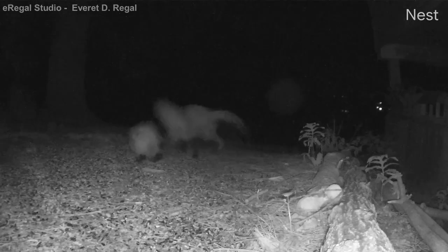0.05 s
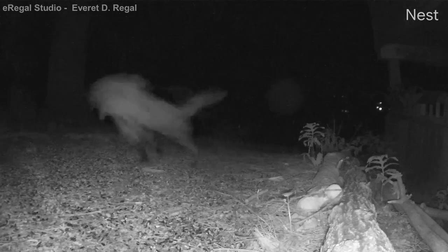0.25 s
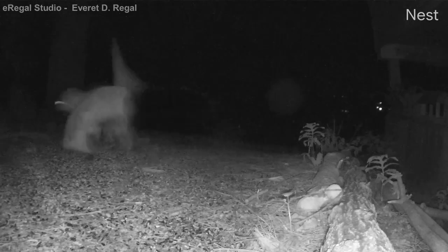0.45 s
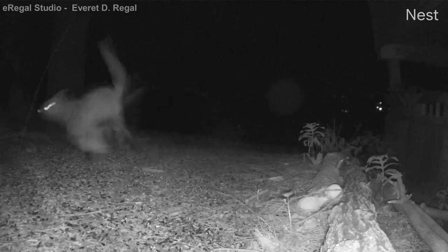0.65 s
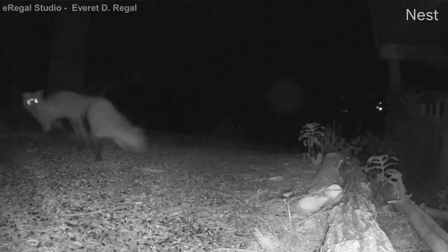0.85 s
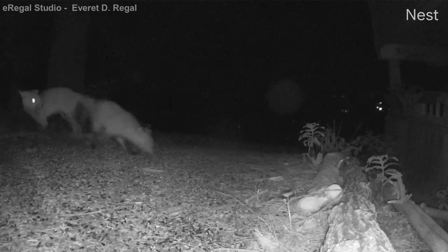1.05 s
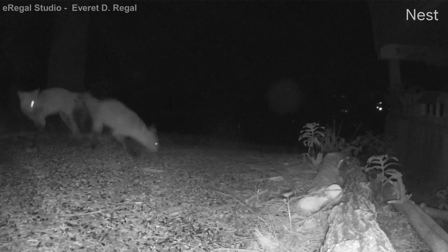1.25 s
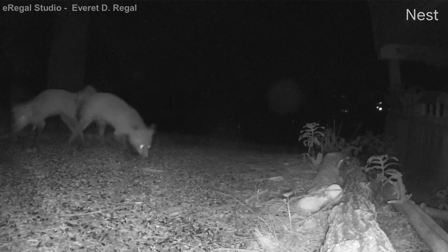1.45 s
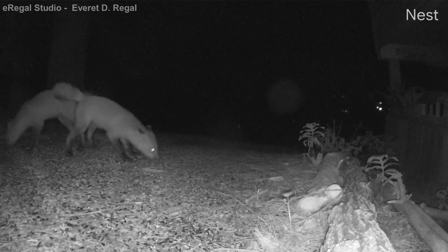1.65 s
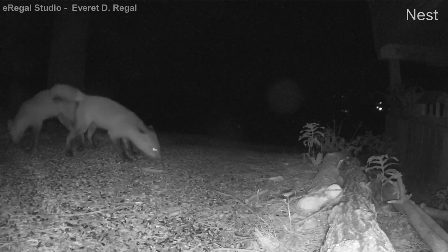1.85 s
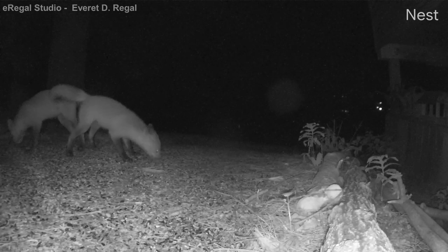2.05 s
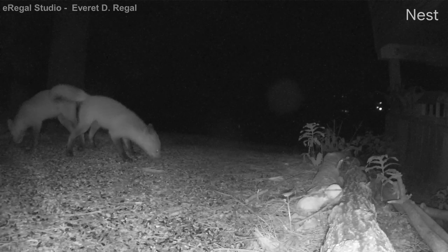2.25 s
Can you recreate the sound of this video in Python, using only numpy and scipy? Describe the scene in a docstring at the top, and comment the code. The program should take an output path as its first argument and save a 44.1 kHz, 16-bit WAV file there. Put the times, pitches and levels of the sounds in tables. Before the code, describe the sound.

Two foxes scuffle in a yard at night, paws thudding and rustling dry leaves. One growls quietly, gives a short whining snarl, then a throaty cough and yelp. An insect trills over faint hiss, heard through a small outdoor microphone.

```python
"""An insect trills steadily over a faint hiss in a yard at night; then two foxes scuffle on dry leaves.
One growls, breaks into a short whining snarl and later gives a throaty cough and yelp. The rough calls
are irregular throat pulses filtered by the mouth; the whine is a harmonic series. Paws thud on the soil
and kick up the litter, whose many tiny cracks merge into a rustle. A house wall and a fence return
faint echoes, and all is heard through a small outdoor camera microphone."""
import sys
import numpy as np
from scipy import signal
from scipy.fft import rfft, irfft, next_fast_len
from scipy.io import wavfile
from scipy.ndimage import uniform_filter1d

SR = 44100
rng = np.random.default_rng(int(sys.argv[2]) if len(sys.argv) > 2 else 0)


def put_to_file(sound):
    """Save the sound as 16-bit audio at rate SR, in the file named by the first command-line argument."""
    columns = np.atleast_2d(sound).T  # one column per channel
    safe = np.clip(columns, -1, 1)
    whole_steps = np.round(safe * 32767)
    wavfile.write(sys.argv[1], SR, whole_steps.astype(np.int16))


N = 101429
T = np.arange(N) / SR

# the insect's tone: (time [s], frequency [Hz], level [dB])
INSECT_TONE = [(0, 3830, -65), (.12, 3772, -64.5), (.35, 3805, -66.5), (1.4, 3835, -69), (2.3, 3852, -68)]
# hiss of the yard: (frequency [Hz], relative density [dB])
HISS_SPECTRUM = [(60, -43.5), (135, -49), (190, -4), (400, -2.5), (900, 1), (2000, 4), (3150, 0),
                 (3400, -23.5), (3620, -22), (3800, 3.5), (4080, -20.5), (4350, 8.5), (5100, 4),
                 (5450, -0.5), (5900, -5.5), (7200, -9), (8000, -26.5), (9300, -19.5), (11000, -38)]
# the opening growl: (time [s], level [dB])
GROWL_ENVELOPE = [(.13, -80.5), (.195, -55), (.222, -64), (.24, -58.5), (.295, -59), (.33, -51.5),
                  (.365, -65), (.4, -51.5), (.418, -107)]
# resonances of a mouth with bared teeth: (frequency [Hz], relative gain [dB])
TEETH_RESPONSE = [(100, -6.5), (185, 8), (330, 1.5), (560, 9), (800, 1.5), (1100, 6), (1500, -6.5),
                  (2000, 1), (2600, -28), (4000, -57)]
# paws sweep the leaves: (start [s], rise [s], relative level [dB], T60 [s], crispness [dB])
LEAF_SCUFFS = [(0.171, 0.055, -64.5, 0.61, 4), (0.325, 0.0052, -53, 0.33, -2.5),
               (.345, 0.04, -55.5, 0.4, 8), (0.402, 0.023, -47, 0.17, 27), (0.426, 0.035, -42.5, 0.16, 1),
               (0.486, 0.006, -49, 0.4, -0.5), (0.55, 0.021, -52, 1, -3.5), (0.629, .016, -39.5, 0.016, -3),
               (0.713, 0.005, -50, 0.15, -2.5), (0.758, 0.014, -52.5, 0.15, 1),
               (0.788, 0.0091, -39, 0.022, -0.5), (0.8, 0.0046, -43, 0.3, -2),
               (.849, 0.006, -45, 0.028, -8), (0.888, 0.018, -42, 0.56, 3.5), (.964, 0.018, -46, 0.14, -1),
               (1.004, 0.0074, -42, 0.31, 3), (1.083, 0.029, -50.5, 0.25, -2),
               (1.119, 0.036, -43.5, 0.28, 0.5), (1.185, 0.0075, -49, 0.72, 2.5),
               (1.233, 0.018, -48, 0.15, 1), (1.28, 0.029, -52.5, 0.52, 1), (1.409, 0.048, -44.5, 0.24, 0),
               (1.462, 0.014, -43.5, 0.18, -3), (1.488, 0.0059, -43.5, 0.079, -9.5),
               (1.51, 0.031, -61, 0.99, 5), (1.61, 0.051, -53, 0.21, -3), (1.681, 0.088, -56, 0.23, -5.5),
               (1.74, .052, -46, 0.63, 0.5), (1.85, 0.043, -56.5, 0.38, 17), (2.137, 0.015, -60, 0.68, 3)]
# dull crunch and crisp edge of the litter: (frequency [Hz], relative gain [dB])
CRUNCH_SPECTRUM = [(150, -31), (300, -11), (600, -8.5), (1000, -1.5), (1500, -11), (1950, -2.5),
                   (2500, 2.5), (3200, 0), (4200, -19), (6000, -55.5)]
CRISP_SPECTRUM = [(2500, -22.5), (3300, -22), (3750, 0), (4150, -3.5), (4550, 2.5), (5100, 4), (5330, -2),
                  (5540, -2.5), (6000, -9.5), (6450, -9.5), (7200, -19.5), (8000, -46.5), (8600, -29.5),
                  (9400, -27.5), (10700, -42), (12000, -26)]
# paws land on soil: (start [s], level [dB], T60 [s], nominal cutoff [Hz], relative body weight [dB])
LANDINGS = [(0.185, -54.5, 0.14, 660, 9), (0.231, -56, 0.25, 650, 7), (.386, -46, 0.056, 670, -20),
            (0.727, -40, 0.057, 670, -11), (0.792, -42, 0.029, 564, 4), (0.814, -45.5, 0.12, 1010, -30),
            (0.853, -51.5, 0.073, 1200, -46), (0.95, -51.5, 0.1, 780, -25),
            (0.981, -52.5, 0.0079, 1100, -20), (1.129, -50.5, 0.07, 686, -17),
            (1.164, -55.5, 0.01, 555, -20), (1.43, -54, 0.02, 475, 8.5), (1.772, -50, 0.043, 820, -30)]
# brittle leaves break under a paw: (start [s], rise [s], relative level [dB], T60 [s])
LEAF_CRUSHES = [(0.429, 0.0017, -35.5, 0.15), (0.437, 0.0042, -49, 0.067), (0.454, 0.0019, -40, 0.035),
                (0.636, 0.006, -43.5, 0.035), (0.791, 0.0034, -38, 0.026), (1.01, 0.022, -46.5, 0.065)]
# cracks of the breaking leaves: (frequency [Hz], relative density [dB])
BRITTLE_SPECTRUM = [(1000, -25), (1700, -10), (2050, -3), (2350, -14), (3200, -46), (3700, -5.5),
                    (4150, 1.5), (4600, -13), (5100, -4), (5500, -18), (5950, 1), (6450, -6), (6800, -18),
                    (8000, -34), (9600, -28), (10700, -41)]
# modes of the crushed leaves: (frequency [Hz], relative level [dB])
LEAF_MODES = [(2050, -11), (3768, -6), (4167, -4), (4520, -3), (4635, -1), (4888, 0), (5100, -2),
              (6185, -8), (6449, -7), (9600, -21)]
# course of the snarl: (time [s], level [dB], roughness [ratio, clipped to 0-1])
SNARL_ENVELOPE = [(.45, -95, 1.2), (.475, -56, 0.93), (.525, -60, 1.16), (.548, -50, 0.6),
                  (.57, -47.5, 0.96), (.588, -38.5, 0.88), (.605, -43.5, 0), (.622, -44.5, 0.24),
                  (.638, -46, 0.6), (.655, -40.5, 0.3), (.684, -43.5, 0.16), (.705, -50, 0.6),
                  (.735, -49.5, 0.76), (.765, -49.5, 0.6), (.835, -60.5, 0.92), (.866, -66, 0.87),
                  (.885, -86, 0.8)]
# fundamental of the whine: (time [s], frequency [Hz])
WHINE_PITCH = [(.54, 350), (.566, 262), (.582, 300), (.594, 405), (.612, 420), (.628, 408), (.638, 440),
               (.647, 468), (.657, 450), (.668, 416), (.684, 412), (.702, 355), (.738, 330), (.755, 288)]
# partials of the whine: (harmonic [number], relative level [dB])
WHINE_PARTIALS = [(1, 5.5), (2, 7), (3, -12), (4, -20)]
# resonances of the snarling throat: (frequency [Hz], relative gain [dB])
THROAT_RESPONSE = [(100, -43), (190, -28), (300, -5), (430, 6.5), (600, 7), (800, 2), (950, 5.5),
                   (1080, -11), (1300, -24), (1600, -22), (3000, -44)]
# bursts of the cough: (start [s], rise [s], level [dB], T60 [s], mouth opening [frequency factor])
COUGH_BURSTS = [(1.406, 0.0062, -58, 0.21, 0.57), (1.418, 0.0095, -55, 0.33, 0.89),
                (1.48, 0.0075, -54, 0.045, 1.05)]
# resonances of the mouth at an opening of 1: (frequency [Hz], relative gain [dB])
MOUTH_RESPONSE = [(200, -38), (400, -22), (570, -18), (730, 8.5), (880, 3.5), (1000, 1), (1130, 1),
                  (1260, -6), (1500, -43), (2000, -9), (3000, -41)]
# the yelp rings in the open mouth: (frequency [Hz], level [dB], rise [s], T60 [s])
YELP_PARTIALS = [(495, -52, 0.0046, .06), (727, -37.5, 0.004, 0.031), (906, -44, 0.0057, 0.079),
                 (1120, -47.5, 0.0054, 0.085), (1357, -55.5, .009, 0.092)]
# house wall and fence: (delay [s], gain [dB])
REFLECTIONS = [(0.014, -32), (.029, -14), (.052, -29.5)]

CRACKS_PER_S = 2800


def from_db(db):
    """Amplitude ratio for a level in decibels."""
    return 10 ** (np.asarray(db) / 20)


def unit_rms(x):
    """Normalisation to unit mean power."""
    return x / np.sqrt(np.mean(x ** 2) + 1e-20)


def in_time(rows):
    """Linear interpolation of each column over the time in the first."""
    times, *columns = np.transpose(rows)
    return [np.interp(T, times, column) for column in columns]


def colour(x, spectrum):
    """Minimum-phase filtering by the given spectrum, normalised to unit power."""
    size = 2 * next_fast_len(N)
    hz, db = np.transpose(spectrum)
    bin_hz = np.maximum(np.arange(size // 2 + 1) * SR / size, 1)
    gain = from_db(np.interp(np.log(bin_hz), np.log(hz), db))
    cepstrum = irfft(np.log(gain))
    cepstrum[1:size // 2] *= 2  # folding the cepstrum makes the filter causal
    cepstrum[size // 2 + 1:] = 0
    return unit_rms(irfft(rfft(x, size) * np.exp(rfft(cepstrum)))[:N])


def drift(corner_hz, size=8192):
    """Low-pass noise of unit power, for random modulation."""
    bin_hz = np.arange(size // 2 + 1) * SR / N
    slow = irfft(rfft(rng.standard_normal(size)) / (1 + (bin_hz / corner_hz) ** 2), size)
    return unit_rms(np.interp(np.arange(N) * size / N, np.arange(size), slow))


def evened(x, window=700):
    """Division by the running RMS holds short-time power steady."""
    power = uniform_filter1d(uniform_filter1d(x ** 2, window), window)
    return x / np.sqrt(power + 1e-6)


def swell(start, rise, t60):
    """Linear attack, then exponential decay by 60 dB in t60 seconds."""
    age = T - start
    return np.clip(age / rise, 0, 1) * from_db(-60 * np.maximum(age - rise, 0) / t60)


def clicks(per_s, spread_db=1):
    """A Poisson train of impulses, uneven in size and sign."""
    sizes = from_db(spread_db * np.minimum(rng.exponential(1, N), 5)) * rng.choice([-1, 1], N)
    return unit_rms(sizes * (rng.random(N) < per_s / SR))


def wavering_tone(hz, width_hz):
    """Narrow-band noise of even strength is heard as an unsteady pitch."""
    phase = 2 * np.pi * hz * T
    return evened(drift(width_hz) * np.sin(phase) + drift(width_hz) * np.cos(phase), window=400)


def insect():
    """Random frequency and amplitude modulation turn a thin tone into a trill."""
    pitch, level_db = in_time(INSECT_TONE)
    phase = 2 * np.pi * np.cumsum(pitch * (1 + 0.006 * drift(120))) / SR
    flutter = from_db(3 * drift(53))
    return from_db(level_db) * unit_rms(np.sin(phase) * flutter)


def hiss():
    """Stationary filtered noise forms the background of the yard."""
    return from_db(-65) * colour(rng.standard_normal(N), HISS_SPECTRUM)


def rasp(resonances, pulses_per_s=130, jitter=0.22):
    """Source and filter: irregular throat pulses, each with a puff of air, excite the mouth."""
    cycles = np.cumsum(pulses_per_s * np.exp(jitter * drift(80.19))) / SR
    pulses = unit_rms(np.diff(np.floor(cycles), prepend=0))
    air = unit_rms(rng.standard_normal(N) * np.exp(-2.5 * (cycles % 1)))
    return evened(colour(pulses + air, resonances))


def growl():
    """Aperiodic voicing through bared teeth gives a quiet, unpitched warning."""
    level_db, = in_time(GROWL_ENVELOPE)
    return from_db(level_db) * rasp(TEETH_RESPONSE)


def tinny_ring(count=50, low_hz=1900, high_hz=10800, waver_hz=16, spread_db=8):
    """Close inharmonic partials ring in the rustle; each scuff brings a new set."""
    spacing_hz = (high_hz - low_hz) / count
    latest_scuff = np.searchsorted(np.sort([row[0] for row in LEAF_SCUFFS]), T)
    shape = (count, len(LEAF_SCUFFS) + 1)
    offset = rng.random(shape)
    level_db = spread_db * rng.uniform(-1.13, 1, shape)
    ring = 0
    for k in range(count):
        hz = low_hz + spacing_hz * (k + offset[k][latest_scuff]) + waver_hz * drift(60)
        gain = uniform_filter1d(from_db(level_db[k][latest_scuff]), size=200)
        ring += gain * np.sin(2 * np.pi * (rng.random() + np.cumsum(hz) / SR))
    return unit_rms(ring)


def rustle():
    """Scuffs set off swarms of tiny cracks over a swish; being incoherent, they add in power."""
    crunch_power, crisp_power = 0, 0
    for start, rise, db, t60, crispness_db in LEAF_SCUFFS:
        power = (from_db(db) * swell(start, rise, t60)) ** 2
        crisp_power += power
        crunch_power += power * from_db(-0.71 * crispness_db) ** 2  # crisper scuffs crunch less
    cracks = clicks(CRACKS_PER_S)
    swish = from_db(4.5) * rng.standard_normal(N)
    litter = evened(cracks + swish)
    ring = tinny_ring()
    crunch = from_db(-7.5) * evened(colour(litter + from_db(-4) * ring, CRUNCH_SPECTRUM))
    crisp = from_db(-0.5) * evened(colour(litter + from_db(7) * ring, CRISP_SPECTRUM))
    flicker = from_db(1.5 * drift(120))
    return (np.sqrt(crunch_power) * crunch + np.sqrt(crisp_power) * crisp) * flicker


def paw_thuds(soil_low_hz=226, body_hz=55, rise_s=0.0032):
    """Each impact is a cluster of band-limited knocks on soil over the low weight of the body."""
    thuds = np.zeros(N)
    body_band = signal.butter(2, body_hz, fs=SR, output="sos")
    body = unit_rms(signal.sosfilt(body_band, rng.standard_normal(N)))
    for start, db, t60, cutoff_hz, weight_db in LANDINGS:
        soil_band = signal.butter(3, [soil_low_hz, 1.14 * cutoff_hz], "band", fs=SR, output="sos")
        knocks = signal.sosfilt(soil_band, clicks(per_s=900) + 1e-18)
        impact = evened(unit_rms(knocks), window=500) + from_db(weight_db - 9) * body
        thuds += from_db(db) * swell(start, rise_s, t60) * impact
    return thuds


def leaf_crush():
    """Brittle fracture: under the hardest steps dry leaves crack and their modes ring."""
    cracks = colour(evened(clicks(CRACKS_PER_S), window=300), BRITTLE_SPECTRUM)
    ring = unit_rms(sum(from_db(db) * wavering_tone(hz, width_hz=35) for hz, db in LEAF_MODES))
    snap = from_db(-5) * cracks + from_db(-1.5) * ring
    return snap * sum(from_db(db) * swell(start, rise, t60) for start, rise, db, t60 in LEAF_CRUSHES)


def snarl(jitter=0.018, shimmer_db=3):
    """Voicing passes from aperiodic rasp to harmonic whine and back in an equal-power blend."""
    level_db, roughness = in_time(SNARL_ENVELOPE)
    roughness = np.clip(roughness, 0, 1)
    pitch, = in_time(WHINE_PITCH)
    phase = 2 * np.pi * np.cumsum(pitch * (1 + jitter * drift(95))) / SR
    harmonics = sum(from_db(db + shimmer_db * drift(83)) * np.sin(k * phase) for k, db in WHINE_PARTIALS)
    whine = unit_rms(harmonics) * (1 + 0.22 * np.sin(phase / 2))  # strong and weak cycles alternate
    voice = np.sqrt(1 - roughness ** 2) * whine + roughness * rasp(THROAT_RESPONSE)
    return from_db(level_db) * voice


def cough():
    """The formants rise from one rasping burst to the next as the mouth opens toward the yelp."""
    bursts = 0
    for start, rise, db, t60, opening in COUGH_BURSTS:
        formants = [(hz * opening, gain_db) for hz, gain_db in MOUTH_RESPONSE]
        bursts += from_db(db) * swell(start, rise, t60) * rasp(formants)
    return bursts


def yelp(start_s=1.484, jitter=0.015):
    """Damped resonances of the open mouth ring in one short, clear cry."""
    clock = np.cumsum(1 + jitter * drift(55)) / SR  # all partials waver together
    return sum(from_db(db) * swell(start_s, rise, t60) * np.sin(2 * np.pi * (hz * clock + rng.random()))
               for hz, db, rise, t60 in YELP_PARTIALS)


def settling_ticks(rise_s=0.0085, t60_s=0.076):
    """Two quickly damped narrow-band ticks sound as the foxes settle."""
    first = from_db(-59.5) * swell(2.028, rise_s, t60_s)
    second = from_db(-56.5) * swell(2.204, rise_s, t60_s)
    return (first + second) * wavering_tone(hz=3510, width_hz=60)


def scene():
    """Superposition of the foxes' direct sound, its delayed reflections and the night background."""
    footwork = rustle() + leaf_crush() + settling_ticks() + paw_thuds()
    foxes = footwork + growl() + snarl() + cough() + yelp()
    echoes = sum(from_db(db) * np.interp(T - delay, T, foxes, left=0) for delay, db in REFLECTIONS)
    return (foxes + echoes + insect() + hiss())[None]


def record(dry, bass_hz=160, leak_db=-19.5, notch_hz=5530, top_hz=10900):
    """The small microphone is a band-pass filter that leaks a little bass and has a treble notch."""
    high_pass = signal.butter(7, bass_hz, "high", fs=SR, output="sos")
    low_pass = signal.ellip(8, 0.2, 70, top_hz, fs=SR, output="sos")
    thin = signal.sosfilt(high_pass, dry) + from_db(leak_db) * dry
    hollow = signal.lfilter(*signal.iirnotch(notch_hz, Q=14, fs=SR), thin)
    return signal.sosfilt(low_pass, hollow)


dry = scene()
out = record(dry)
put_to_file(out)
```